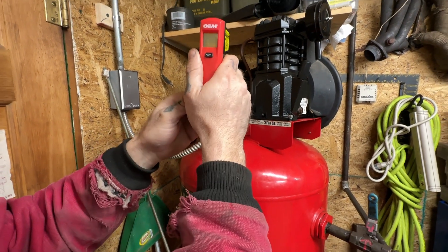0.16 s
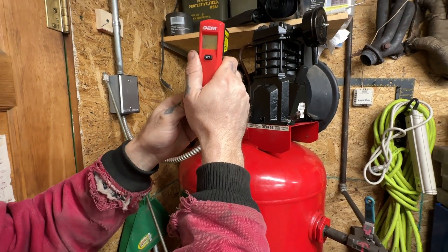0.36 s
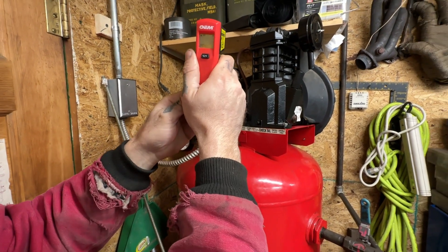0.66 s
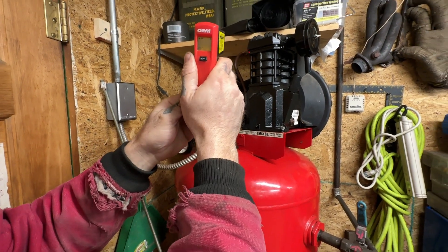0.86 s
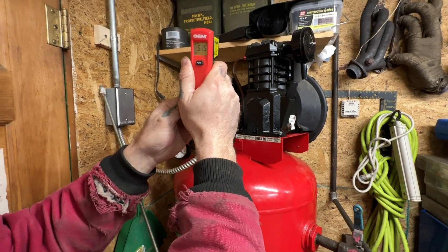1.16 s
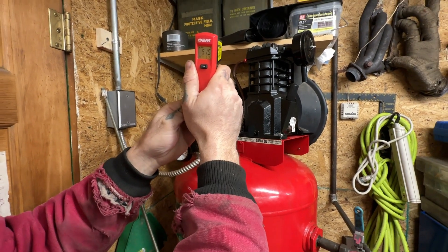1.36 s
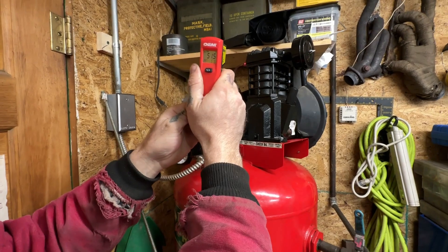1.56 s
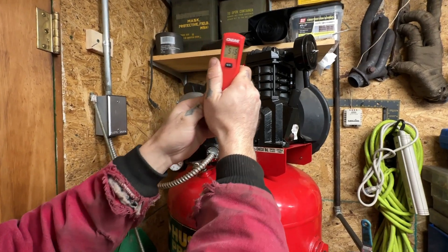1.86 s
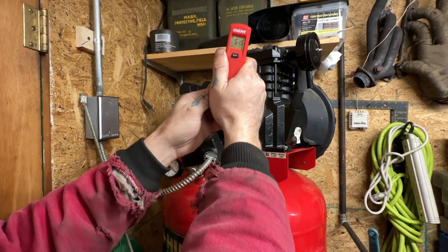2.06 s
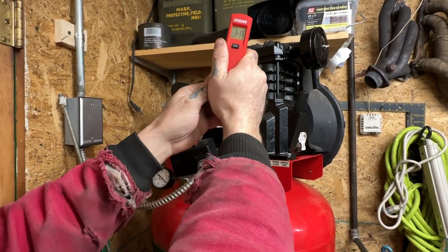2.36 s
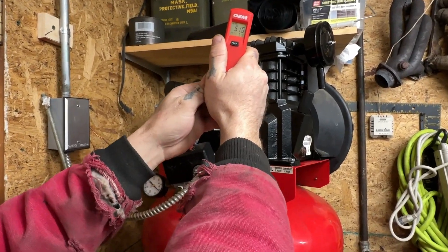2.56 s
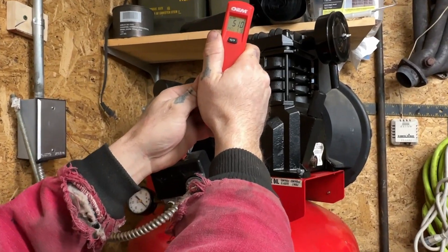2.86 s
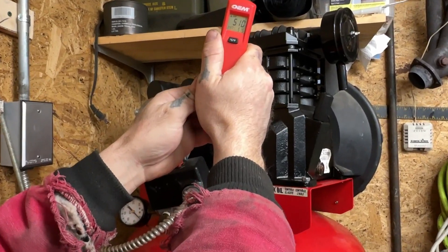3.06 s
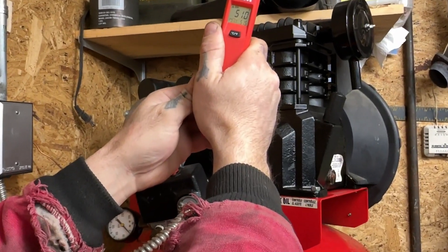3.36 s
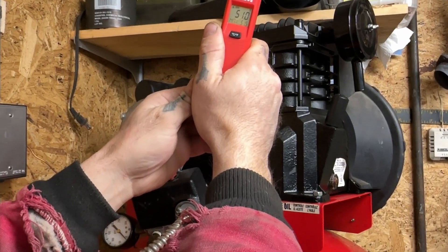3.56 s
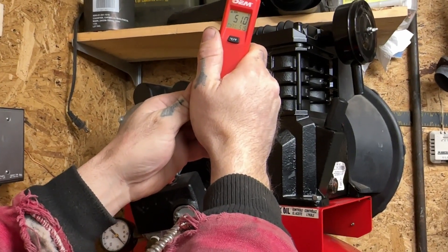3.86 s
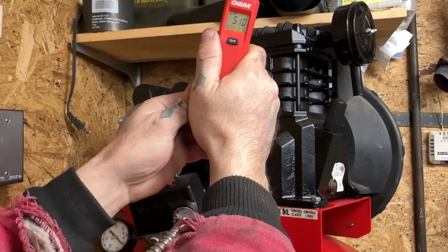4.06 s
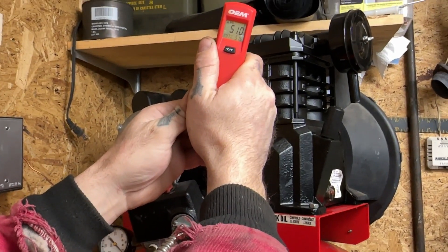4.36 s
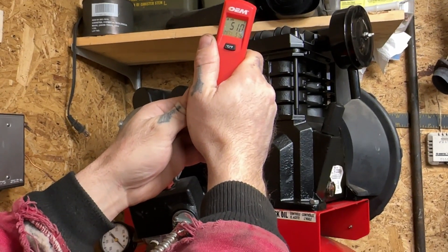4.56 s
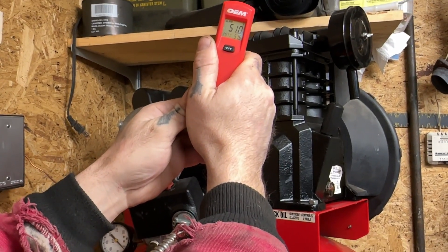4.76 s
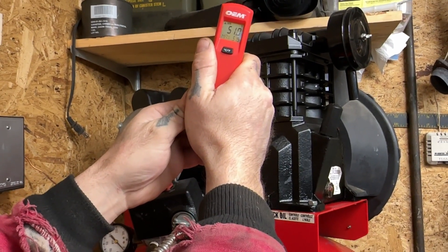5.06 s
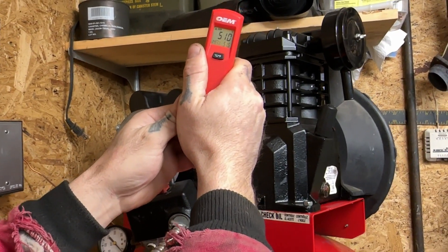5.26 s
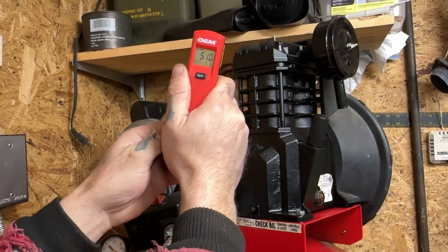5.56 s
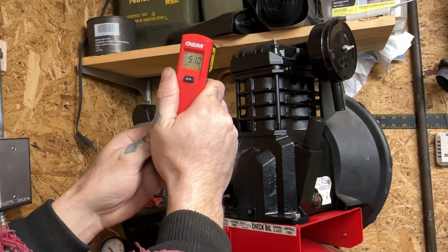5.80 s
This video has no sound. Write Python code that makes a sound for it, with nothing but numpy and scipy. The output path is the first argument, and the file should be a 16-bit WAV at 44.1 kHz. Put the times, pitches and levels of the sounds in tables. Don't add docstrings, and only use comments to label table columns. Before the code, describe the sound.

Fast throbbing compressor with resonant intake gulps, valve clacks and airy hiss, loud for half a second, then far quieter and finally barely audible.

```python
import sys
import numpy as np
from scipy import signal
from scipy.fft import rfft, irfft, next_fast_len
from scipy.io import wavfile
from scipy.ndimage import uniform_filter1d

SR = 44100
rng = np.random.default_rng(int(sys.argv[2]) if len(sys.argv) > 2 else 0)


def how_loud(loudness_db):
    steps = np.asarray(loudness_db, float) / 20
    return 10 ** steps


def wav_out(sig):
    wavfile.write(sys.argv[1], SR, np.round(np.clip(np.atleast_2d(sig).T, -1, 1) * 32767).astype(np.int16))


N = 261557

T = np.arange(N) / SR
M = next_fast_len(N + 4096)
HZ = np.arange(M // 2 + 1) * SR / M
CRANK_HZ = 16.9395
CUT_S = 5.1055
# (frequency [Hz], density [dB per Hz])
FAINT = [(20, -80), (20000, -80)]


def level(x, db):
    return x * how_loud(db) / np.sqrt(np.mean(x ** 2))


def noise(shape, modes=()):
    hz, db = np.transpose(shape)
    power = how_loud(np.interp(np.log(HZ + 1), np.log(hz), db)) ** 2
    for f, width, peak_db in modes:
        power = power + how_loud(peak_db) ** 2 / (1 + (2 * (HZ - f) / width) ** 2) ** 2
    white = rng.standard_normal(M)
    return level(irfft(rfft(white) * np.sqrt(power), M)[:N], 0)


def band(hz, width):
    return noise(FAINT, [(hz, width, 0)])


def walk(rate):
    k = int(SR / rate)
    steps = np.repeat(rng.standard_normal(N // k + 1), k)
    return 0.99 * uniform_filter1d(uniform_filter1d(steps, k), k)[:N]


def curve(table):
    return np.interp(T, *np.transpose(table))


def swells(rows, size=lambda db: db):
    return sum(size(db) * np.exp(-(2 * (T - at) / length) ** 2) for at, length, db in rows)


def held(start, end, db, fade_s):
    return how_loud(db) * np.clip(np.minimum(T - start, end - T) / fade_s + .5, 0, 1)


def handling():
    return level(band(90.0, 85.0), -64) * how_loud(3.2 * walk(11)) * np.exp(-((T - .22) / 0.3) ** 2)


def motor_hum():
    # (frequency [Hz], level [dB])
    hum_tones = [(53.1, -68), (58.7, -59), (79.7, -70), (92.9, -61), (106.2, -68), (119.9, -54),
                 (318.5, -62), (359.9, -57), (479.9, -57), (719.8, -67)]
    return sum(np.sqrt(2) * how_loud(db) * np.sin(2 * np.pi * (f * T + rng.random())) for f, db in hum_tones)


def extras(gate):
    # (start [s], end [s], level [dB])
    leak = (0.87, 1.94, -20)
    # (start [s], end [s], level [dB])
    jet = (2.78, 5.2, -27.5)
    # (centre [s], length [s], level [dB])
    fin_rings = [
        (0.85, .16, -17),
        (1.12, 0.077, -20.5),
        (1.6, .1, -24),
    ]
    # (centre [s], length [s], level [dB])
    plate_rings = [
        (0.96, .1, -16),
    ]
    # (centre [s], length [s], level [dB])
    rattles = [
        (0.7, 0.035, -24.5),
        (0.89, 0.046, -25),
        (2.15, 0.12, -17),
        (2.33, 0.16, -22),
        (2.62, 0.24, -22),
        (4.46, .1, -28),
    ]
    whistle = band(10800.0, 1000.) + 0.51 * band(10857., 70.)
    flow = held(*leak, fade_s=0.34) * whistle + held(*jet, fade_s=.08) * band(14200., 900.)
    flow = flow + swells(fin_rings, how_loud) * band(3120.0, 260.)
    flow = flow + swells(plate_rings, how_loud) * band(4570.0, 900.)
    return how_loud(-38.5) * (gate * flow + swells(rattles, how_loud) * band(1453.0, 90.))


def valves(turn):
    # (crank angle [turn], ring [Hz], level [dB])
    clacks = [
        (.435, 810, -56.5),
        (.95, 1060, -62),
    ]
    half_length_s, air_share = 0.0021, 0.74
    out = 0
    for at, hz, db in clacks:
        since = ((turn - at + .5) % 1 - .5) / CRANK_HZ
        ring = np.sqrt(2) * np.sin(2 * np.pi * hz * since) + air_share * band(hz, 490.0)
        out = out + level(ring * np.exp(-(since / half_length_s) ** 2), db - 9.5)
    return out


def port_gate(turn):
    stroke = np.floor(2 * turn + 0.18).astype(int)
    gate_db = uniform_filter1d(.4 * rng.standard_normal(300)[stroke], 300) + .3 * walk(4)
    gate_db = gate_db + 1.9 * np.cos(4 * np.pi * (turn - .155)) - .4 * np.cos(8 * np.pi * (turn - .155))
    gate_db = gate_db - 1.5 * np.exp(8 * np.cos(2 * np.pi * (turn - .92)) - 8)
    gate_db = gate_db + .4 * np.cos(2 * np.pi * (turn - .7))
    ripple = 1 + .08 * np.cos(2 * np.pi * 19 * turn) + .08 * np.cos(2 * np.pi * 18 * turn)
    return how_loud(gate_db) * ripple


def hiss(gate, later):
    # (frequency [Hz], density [dB per Hz])
    hiss_early = [(1060, -26), (1800, -11.5), (1970, -13.5), (2380, -11.5), (2610, -6.5), (2830, -5.5),
                  (4220, -1.5), (5010, -6), (7070, -3.5), (7540, -5.5), (8330, 1.5), (10900, -14.5),
                  (14500, -15), (15700, -13)]
    hiss_late = [(1060, -42), (1800, -11), (1950, -11), (2430, -13.5), (2610, -10.5), (2810, -7.5),
                 (3240, -3), (4300, -3.5), (5900, -6.5), (8630, -1.5), (10100, -11), (13000, -12.5),
                 (14200, -24), (15700, -5)]
    # (frequency [Hz], width [Hz], level [dB])
    metal_early = [(2580, 69, -4), (3340, 150, -5), (4170, 110, -3), (4950, 51, -8), (5120, 22, -8),
                   (5450, 82, -8), (6300, 59, -5), (6930, 330, -5), (8050, 77, 0), (8380, 170, -1),
                   (8570, 55, 0), (9200, 31, -6), (9330, 23, -5), (9630, 86, -8), (10200, 36, -10),
                   (11800, 330, -13), (13900, 90, -13), (14600, 47, -13)]
    metal_late = [(2290, 66, -10), (2590, 60, -6), (3600, 29, -4), (4310, 170, -3), (5600, 42, -4),
                  (6210, 55, -6), (6600, 130, -5), (7220, 42, -1), (7390, 56, -5), (8020, 37, -3),
                  (8380, 65, 0), (8670, 33, -1), (8870, 45, -2), (9210, 42, -6), (10500, 53, -11),
                  (11500, 96, -8), (13700, 66, -8), (14300, 62, -9)]
    later = np.clip(later, 0, 1)
    early_share, late_share = np.sqrt(1 - later), np.sqrt(later)
    broad = early_share * noise(hiss_early) + late_share * noise(hiss_late)
    metal = 0
    for part, part_db, throb in ((slice(0, 7), -10.5, 0), (slice(7, 14), -8.5, 0),
                                 (slice(14, None), -17.5, 0.78)):
        plates = early_share * noise(FAINT, metal_early[part]) + late_share * noise(FAINT, metal_late[part])
        metal = metal + gate ** throb * how_loud(part_db + 1.3 * walk(9)) * plates
    return gate ** 0.62 * broad + gate ** 1.62 * metal


def strokes(turn, orders, start, steps, lo, hi):
    cycle = np.arange(4097) / 4096
    wave = 0 * cycle
    for k, db in orders:
        if lo <= k <= hi:
            lag = sum(size * (np.arctan((k - at) / width) + np.pi / 2) for at, width, size in steps)
            wave = wave - np.sqrt(2) * how_loud(db) * np.sin(2 * np.pi * round(k) * (cycle - start) - lag)
    return np.interp(turn % 1, cycle, wave)


def pump(turn, shadow_db):
    # (multiple of crank speed, level [dB])
    stroke_orders = [(2, -47.5), (4, -47.5), (6, -55), (8, -59), (10, -61.5), (12, -55.5), (14, -50.5),
                     (16, -54.5), (18, -43.5), (20, -42.5), (22, -52.5), (24, -62.5), (26, -80), (28, -88),
                     (30, -83), (32, -68), (34, -64), (36, -73), (38, -58), (40, -67.5), (42, -76),
                     (44, -73), (46, -72.5), (48, -70.5), (50, -89), (62, -89), (64, -73), (66, -90),
                     (68, -74), (74, -94), (76, -66), (78, -87), (80, -72.5), (118, -77.5)]
    # (multiple of crank speed, level [dB])
    turn_orders = [(1, -68), (17, -66.5), (19, -50.5), (21, -70), (23, -62), (25, -67), (31, -65.5),
                   (33, -68), (35, -75), (37, -64.5), (39, -67.5), (47, -76.5), (49, -79), (51, -79.5),
                   (53, -85), (57, -77), (59, -103), (61, -75), (65, -76.5), (67, -73), (77, -62),
                   (81, -78), (153, -87), (155, -75.5)]
    tube_steps = [
        (11, .5, -1.26),
        (13, .5, 1),
        (19, .05, 1),
        (21, .3, .15),
        (30, .5, -1),
        (38.5, .5, 1),
    ]
    # (frequency [Hz], density [dB per Hz])
    rumble = [(15, 7.5), (45, 3), (75, 7), (115, -3), (165, -27), (235, -9), (300, -30), (600, -58)]
    # (frequency [Hz], density [dB per Hz])
    rush = [(230, -8.5), (320, 3), (420, 1), (510, -6.5), (610, 1.5), (800, -15), (950, -16), (1400, -12),
            (2200, -25.5), (4000, -57)]
    # (frequency [Hz], width [Hz], level [dB])
    rush_modes = [(428.7, 20.5, 8), (630, 19, -11), (1057, 30, -6.5), (1310, 27, -22), (1947, 25, -10.5),
                  (1800, 30, -32), (1590, 46, -14.5)]
    # (centre [s], length [s], change [dB])
    sways = [(0.03, 0.14, -7), (0.14, 0.069, 5.5), (0.32, 0.12, 1.5), (0.59, 0.15, 3), (0.83, 0.19, -18),
             (0.92, .07, 9), (0.99, 0.091, -12), (1.2, 0.18, -5), (1.41, 0.14, 8), (2.29, .14, -11),
             (2.43, .12, 4), (3.7, 0.2, -7), (5.08, 0.089, 4)]
    # (centre [s], length [s], change [dB])
    head_dips = [
        (0.15, .1, -2.5),
        (0.97, 0.11, -9),
    ]

    def part(lo, hi):
        alike = strokes(turn, stroke_orders, .39, tube_steps, lo, hi)
        return alike + strokes(turn, turn_orders, .33, [], lo, hi)

    far = np.clip((1 - T) / 0.25, 0, 1)
    low = how_loud(-7 * far) * part(1, 2) + part(3, 10)
    low = low + level(noise(rumble), -52.5) * how_loud(1.7 * walk(5.1))
    box = part(11, 16)
    tube = how_loud(1.1 * walk(3.12)) * part(17, 30)
    second = how_loud(swells(sways) - 0.6) * part(36, 41)
    head = how_loud(-2.1 + swells(head_dips)) * part(75, 79)
    rings = tube + second + head + part(80, 160)
    edge = how_loud(0.46 * walk(15)) * (part(31, 35) + part(42, 74))
    rush_db = 1.2 * walk(4.88) + 0.16 * np.minimum(shadow_db + 10.0, 0)
    intake = edge + level(noise(rush, rush_modes), -48.0) * how_loud(rush_db)
    clack = how_loud(1.5 - 9 * far) * valves(turn)
    shadowed = how_loud(shadow_db + 0.7) * low + how_loud(0.5 * (shadow_db - 0.5)) * (box + motor_hum())
    return shadowed + rings + clack + how_loud(1.63 - far + 0.65 * shadow_db) * intake


def hurried(x, grain_s=.04):
    tube_hz = 321.85
    hop, out = int(grain_s * SR), np.zeros(N + SR)
    skip = np.cumsum(rng.integers(16, 22, 60))
    for k in range(int(SR / hop)):
        start = int(2.3 * SR + k * hop + skip[k] * SR / tube_hz)
        at = int(CUT_S * SR) + (k - 1) * hop
        out[at:at + 2 * hop] += np.hanning(2 * hop) ** 0.84 * x[start:start + 2 * hop]
    return out[:N]


def scene():
    # (time [s], level [dB])
    fader = [
        (0.55, -18),
        (0.68, -22.5),
        (0.84, -28.5),
        (1.2, -37.5),
        (2.1, -37.5),
    ]
    # (time [s], level [dB])
    shadow = [
        (0.04, -1.5),
        (0.19, -4.5),
        (0.59, -13.5),
        (0.67, -10),
        (0.84, -14),
        (1.2, -5),
    ]
    turn = CRANK_HZ * T + .008 * np.maximum(1 - T, 0)
    gate = port_gate(turn)
    ports = hiss(gate, 0.91 * np.clip((T - .5) / 2.3, 0, 1))
    machine = handling() + extras(gate) + how_loud(-49.5) * ports + pump(turn, curve(shadow))
    before = how_loud(curve(fader) + 39.0) * machine
    after = how_loud(-54 + 40.0) * hurried(machine)
    return np.where(T < CUT_S, before, after)[None]


def roll_off(x):
    return signal.sosfilt(signal.butter(12, 16290, fs=SR, output="sos"), x)


def record(dry):
    response = np.clip((15750 - HZ) / 40, 0, 1) * how_loud(-3.5 * (HZ > 15050))
    mix = irfft(rfft(dry, M) * response, M)[:, :N]
    return roll_off(mix)


dry = scene()
out = record(dry)
wav_out(out)
```